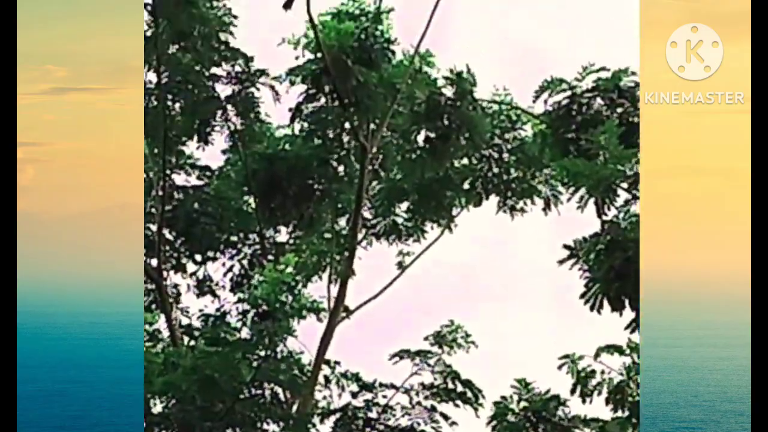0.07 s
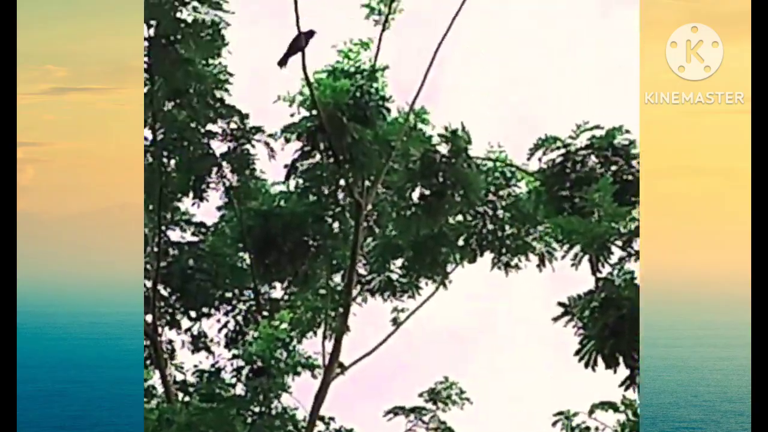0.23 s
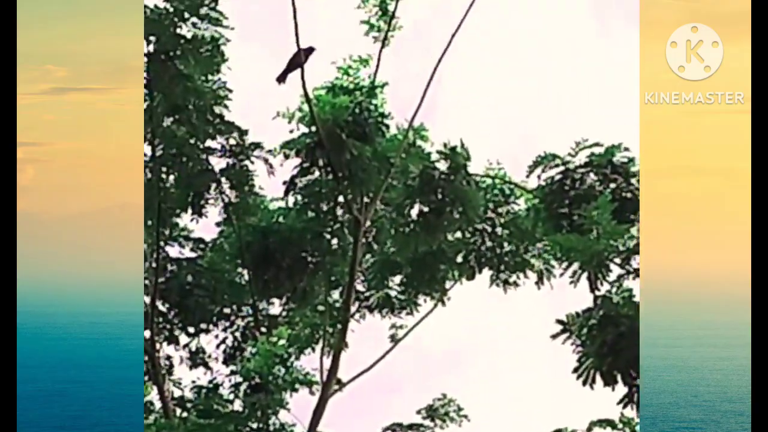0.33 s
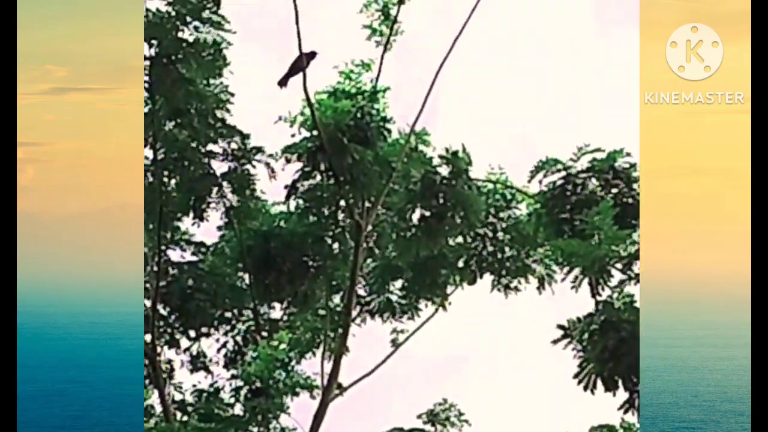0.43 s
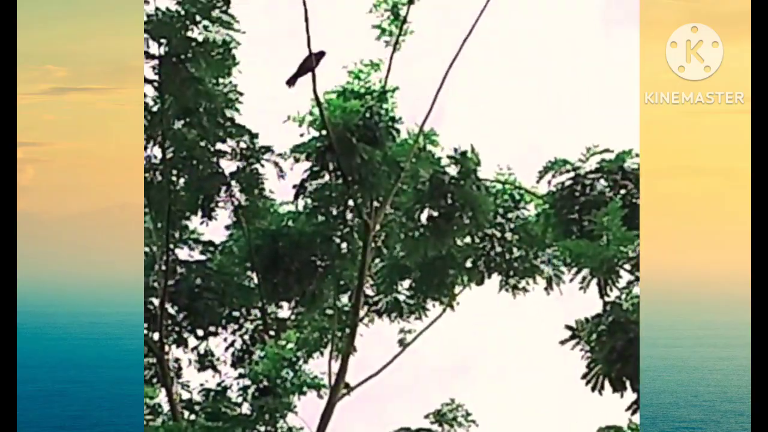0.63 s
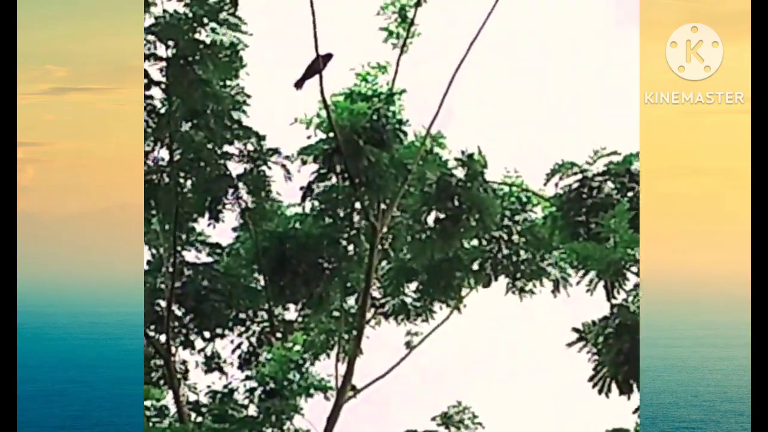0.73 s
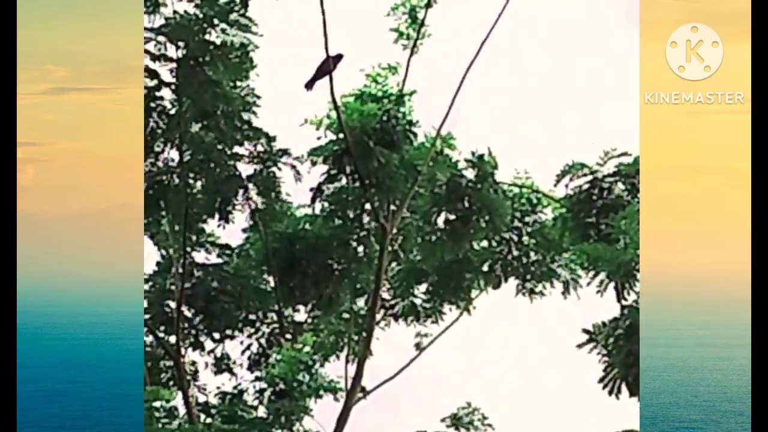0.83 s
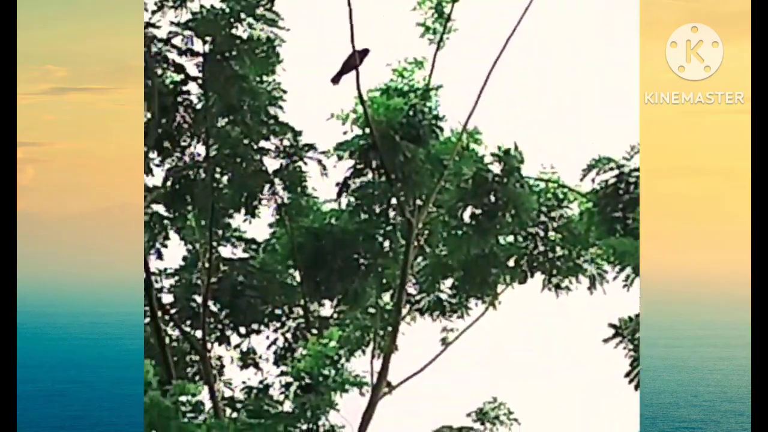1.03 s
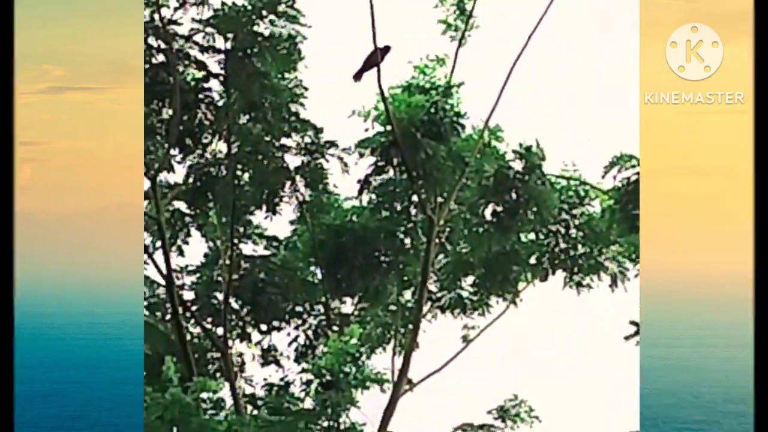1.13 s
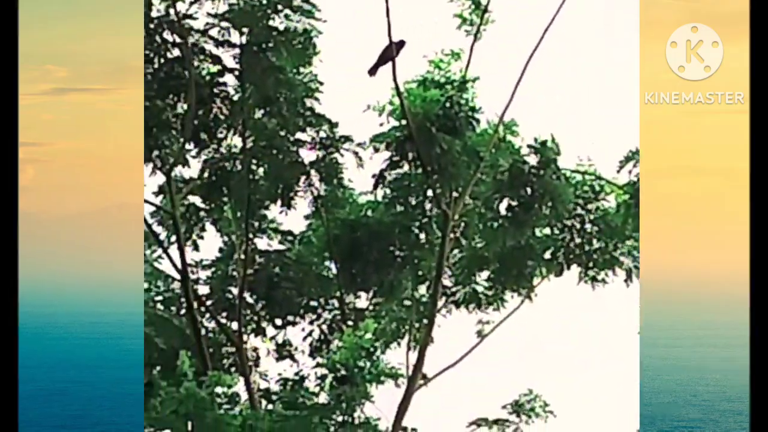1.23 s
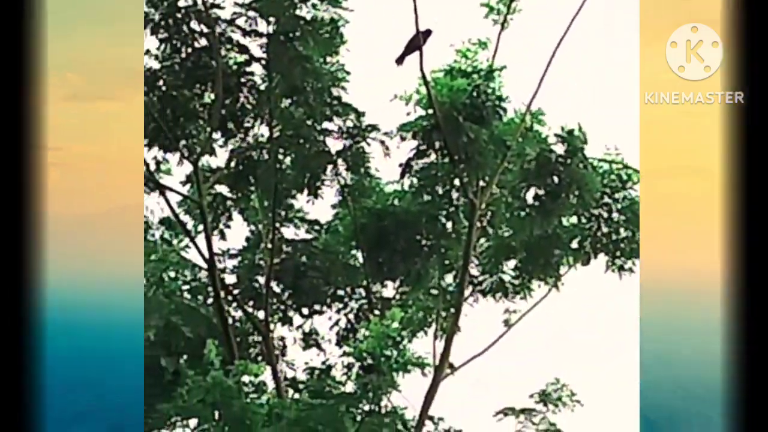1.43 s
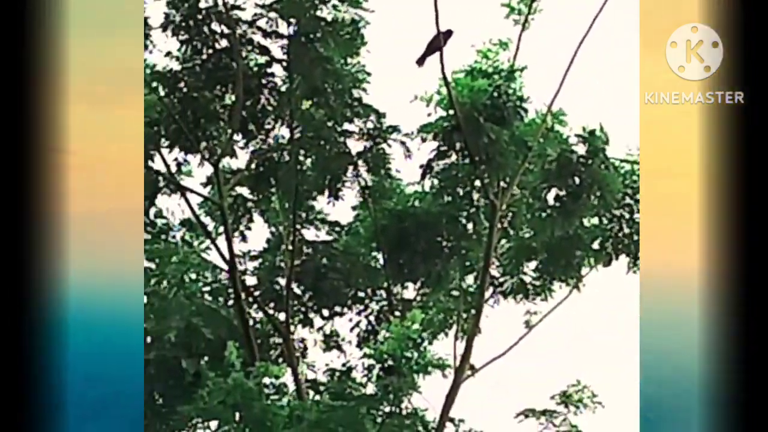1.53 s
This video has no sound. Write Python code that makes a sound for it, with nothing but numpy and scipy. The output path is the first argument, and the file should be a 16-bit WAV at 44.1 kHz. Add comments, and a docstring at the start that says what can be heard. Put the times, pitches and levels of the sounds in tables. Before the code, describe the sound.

A koel whistles one loud, nearly pure note from about 0.2 to 0.6 seconds, sagging, rising and falling away, then echoing among the trees. A small bird gives quieter high trills that slow as they go, at the start, at 0.6 and at 1.2 seconds, with a few short chirps from others. A faint distant engine drone and soft open-air rumble and hiss continue throughout.

```python
"""Among leafy trees in the open air, a koel gives one loud whistled note that sags, rises and falls away.
Its voice box makes a nearly pure tone, a second, slower vibration adds side tones, and the note rings
on among the trees. A small bird repeats a high trill of quick downward sweeps that slows as it goes,
and others chirp. Behind the birds a distant engine drones and the open air rumbles and hisses."""
import sys
import numpy as np
from scipy import signal
from scipy.fft import rfft, irfft
from scipy.io import wavfile
from scipy.ndimage import uniform_filter1d

SR = 44100
rng = np.random.default_rng(int(sys.argv[2]) if len(sys.argv) > 2 else 0)


def inscribe(sig):
    """Save sig as 16-bit PCM at rate SR to the path in sys.argv[1].

    A 1-D sig is mono; a 2-D sig holds one channel per row.
    Samples are clipped to [-1, 1] before scaling.
    """
    pcm = np.round(np.clip(np.atleast_2d(sig).T, -1, 1) * 32767)
    wavfile.write(sys.argv[1], SR, pcm.astype(np.int16))


N = 70560
TIME = np.arange(N) / SR

# the koel's note: (time [s], pitch [Hz])
KOEL_PITCH = [(.206, 850), (.22, 1170), (.234, 1256), (.27, 1229), (.305, 1202), (.335, 1194), (.365, 1201),
              (.4, 1229), (.44, 1278), (.475, 1317), (.503, 1327), (.53, 1310), (.555, 1272), (.58, 1165),
              (.605, 1020), (.64, 850)]
# its main tone through the branches; pan means left minus right: (time [s], level [dB], pan [dB])
KOEL_LEVEL = [(0.208, -51, -35), (0.226, -29, 22), (0.241, -19.5, 0.5), (0.259, -19.6, 6),
              (0.289, -22, -16), (0.303, -28, -20), (0.33, -25, -12), (0.359, -25, -4), (0.388, -18.5, -12),
              (0.422, -17.5, 2), (0.436, -27.5, 2), (0.457, -25.5, -15), (0.469, -19, 1),
              (0.49, -19.5, -8.5), (0.527, -21.5, -2), (0.543, -32, -5), (0.554, -21.5, 9),
              (0.564, -31.5, -2), (0.573, -26, -12), (0.579, -28, -7), (0.61, -30.5, -9.5),
              (0.639, -45.5, -2)]
# how much sooner that tone reaches the left ear: (time [s], lead [ms])
LEFT_LEAD = [(.425, 0.31), (.468, 0.075), (.53, 0.078), (.56, 0.37)]
# the voice is rough as it starts and as it falls away: (time [s], phase jitter [rad])
ROUGHNESS = [(.21, 0.61), (.232, 0.01), (.55, 0.069), (.6, 0.29)]
# the tone an octave up, which flares at the start and stays strong in the fall: (time [s], level [dB])
OCTAVE = [(.205, -52), (.22, -42.5), (.25, -60), (.272, -44), (.31, -57), (.35, -63), (.39, -43),
          (.42, -54), (.495, -43), (.555, -47.5), (.595, -44), (.64, -62)]
# the bird's effort, which sets the high overtones and the rasp: (time [s], gain [dB])
EFFORT = [(.205, -15), (.26, -3), (.52, -2.5), (.64, -9)]
# high overtones: (multiple of the pitch, base level [dB])
OVERTONES = [(3, -60), (4, -65), (5, -50.5), (6, -57), (7, -71), (8, -67)]
# depth of the flutter, the second vibration, strongest at the top of the note: (time [s], gain [dB])
FLUTTER_DEPTH = [(.22, -13.5), (.41, -13), (.44, -3.5), (.53, -2), (.57, -16.5)]
# tones made by the flutter: (multiple of the pitch, flutter steps up or down, base level [dB])
SIDE_TONES = [(1, -1, -48), (1, 1, -50), (2, -1, -49), (4, 1, -46), (5, -1, -58), (5, 1, -53), (6, -1, -61),
              (6, 1, -59)]
# resonances of the throat: (centre [Hz], width [Hz], gain [dB])
THROAT = [(5980, 170, 8), (7900, 220, -5), (10500, 420, 11)]
# colour of the rasp in the note: (frequency [Hz], relative level [dB])
RASP_COLOUR = [(700, -19), (1200, -13), (2300, 1.5), (3500, 1), (5000, -2.5), (6600, 11), (8800, -10),
               (10500, 6), (12000, -19), (14500, 1)]
# where the overtones and rasp sit between the ears: (frequency [Hz], pan [dB])
VOICE_PAN = [(2400, -8.5), (5800, 0), (10500, -8)]
# echoes from the trees: (delay [s], gain [dB], pan [dB])
TREE_ECHOES = [(0.054, -18.5, -10.5), (.099, -23, -6), (.19, -22, -5.5), (0.301, -27.5, -4.5),
               (.5, -39, -6), (.76, -39, -0.5)]
# the small bird's trills: (start [s], length [s], base level [dB])
TRILLS = [(-.04, 0.34, -40), (0.592, 0.36, -41.5), (1.2, .43, -41)]
# how each trill swells: (share of its length, gain [dB])
TRILL_SWELL = [(.25, -6.5), (.55, -2), (1, -4)]
# single chirps: (start [s], length [s], first pitch [Hz], last pitch [Hz], wobble [Hz], level [dB])
CHIRPS = [(0, 0.12, 4680, 4170, 390, -46), (0.29, 0.066, 4660, 4520, 303, -47),
          (0.364, 0.057, 4700, 4190, 243, -45.5), (1.227, 0.059, 3870, 4270, 399, -45)]
# faint high lisps: (middle [s], length [s], level [dB])
LISPS = [(0.806, 0.42, -58), (1.16, 0.33, -57.5)]
# tones of the distant engine: (frequency [Hz], level [dB])
ENGINE_TONES = [(88, -57.5), (113, -45.5), (136, -49.5), (161, -54)]
# far rumble of the open air: (frequency [Hz], relative level [dB])
RUMBLE_COLOUR = [(25, -5.5), (60, -5), (110, 0.5), (200, -0.5), (300, -10), (430, -6.5), (560, -25),
                 (900, -22.5)]
# hiss of the open air: (frequency [Hz], relative level [dB])
HISS_COLOUR = [(560, 5), (900, 6.5), (1500, 5), (2700, 4), (3600, -2), (5000, 1), (7000, -9.5), (8300, -12),
               (10200, -9.5), (11200, -40.5), (15000, -11)]
# where the open air sits between the ears: (frequency [Hz], pan [dB])
AIR_PAN = [(2000, -1), (7000, -1.5)]
# how alike a noise is in the two ears: (frequency [Hz], likeness [0 to 1])
EAR_LIKENESS = [(130, 0.86), (630, 0.78), (1390, 0.28), (14000, 0.089)]

FLUTTER_HZ, AT_PITCH_HZ, FLUTTER_POWER = 330, 1195, 2.2   # the flutter rises faster than the pitch
RASP_DB, FLICKER_DB, JITTER_HZ = -40.5, 3.5, 95
FIRST_GAP_S, LAST_GAP_S = .00803, .034   # from one sweep of a trill to the next
TRILL_START_HZ, TRILL_END_HZ, SWEEP_HZ, SWEEP_SHARE = 4970, 5320, 820, .75
TRILL_WOBBLE_HZ, WOBBLE_RATE_HZ = 110, 600   # a fast pitch wobble makes the small birds sound rough
WHISTLE_START_S, WHISTLE_S, WHISTLE_HZ, WHISTLE_DB = .8, .135, 4020, -56.5
LISP_HZ, LISP_WOBBLE_HZ = 7030, 370
CHIRP_PAN_DB, WHISTLE_PAN_DB, LISP_PAN_DB = -8.5, 7, 20
ECHO_CUT_HZ, ECHO_SMEAR_S, ECHO_SMEAR_DB = 2040, 0.0036, -2.5
ECHO_OVERTONE_DB = 7.5   # lift of the overtones before the trees dull them
KOEL_RING_DB, TRILL_RING_DB, CHIRP_RING_DB = -16.5, 1, -0.5   # how strongly each rings in the grove
LOW_RING_S, HIGH_RING_S, RING_SPLIT_HZ = 2.1, 0.79, 1580   # times to fade by 60 dB
RUMBLE_DB, HISS_DB, NOISE_LEAD_S = -45, -49.5, .00036
CUTOFF_HZ = 15300


def koel():
    """The voice box whistles a nearly pure tone with overtones and rasp; its flutter adds side tones."""
    pitch = uniform_filter1d(in_time(KOEL_PITCH)[0], size=500)
    phase = phase_of(pitch) + in_time(ROUGHNESS)[0] * drift(JITTER_HZ)
    flutter_hz = FLUTTER_HZ * (pitch / AT_PITCH_HZ) ** FLUTTER_POWER
    flutter_phase = phase_of(flutter_hz)
    effort_db, depth_db = in_time(EFFORT)[0], in_time(FLUTTER_DEPTH)[0]
    start, end = KOEL_LEVEL[0][0], KOEL_LEVEL[-1][0] + 0.014
    gate = np.clip(np.minimum(TIME - start, end - TIME) / 0.0029, 0, 1)   # quick fade in and out

    overtones = voice_tone(2 * pitch, 2 * phase, in_time(OCTAVE)[0])
    for multiple, db in OVERTONES:
        overtones += voice_tone(multiple * pitch, multiple * phase, db + effort_db)
    for multiple, step, db in SIDE_TONES:
        side_hz = multiple * pitch + step * flutter_hz
        overtones += voice_tone(side_hz, multiple * phase + step * flutter_phase, db + depth_db)
    rasp = from_db(RASP_DB + (effort_db + depth_db) / 2) * noise(RASP_COLOUR, VOICE_PAN)
    edge = gate * (overtones + rasp)   # everything but the main tone

    level_db, pan_db = in_time(KOEL_LEVEL)
    strength = np.sqrt(2) * gate * from_db(level_db)
    ear_shift = np.pi * pitch * in_time(LEFT_LEAD)[0] / 1000 * np.array([[1], [-1]])
    direct = strength * np.sin(phase + ear_shift) * panned(pan_db) + edge
    whistle = strength * np.sin(phase)
    echoes = tree_echoes(whistle + from_db(ECHO_OVERTONE_DB) * edge[1])
    return direct + echoes + from_db(KOEL_RING_DB) * grove(whistle + edge[1])


def voice_tone(hz, phase, db):
    """One flickering overtone or side tone of the koel, coloured by its throat."""
    throat_db = sum(gain * np.exp(-((hz - centre) / width) ** 2) for centre, width, gain in THROAT)
    flicker_db = FLICKER_DB * np.array([drift(20), drift(15.5)])
    tone = np.sqrt(2) * np.sin(phase + rng.uniform(0, np.pi / 2, (2, 1)))
    return from_db(db + throat_db + flicker_db) * panned(at_hz(VOICE_PAN, hz)) * tone


def trills():
    """A small bird sings runs of quick downward sweeps that slow, rise and swell; leaves scatter them."""
    song = np.zeros(N)
    wobble_hz = TRILL_WOBBLE_HZ * drift(WOBBLE_RATE_HZ)
    for start, run_s, db in TRILLS:
        onset = start
        while onset < start + run_s:
            along = (onset - start) / run_s
            gap = FIRST_GAP_S * (LAST_GAP_S / FIRST_GAP_S) ** along * rng.uniform(.984, 1.016)
            length = gap * SWEEP_SHARE
            centre_hz = TRILL_START_HZ + (TRILL_END_HZ - TRILL_START_HZ) * along
            hz = centre_hz + wobble_hz + SWEEP_HZ * (.5 - np.clip((TIME - onset) / length, 0, 1))
            level_db = db + np.interp(along, *np.transpose(TRILL_SWELL)) + rng.normal(0, 1.5)
            song += from_db(level_db) * arch(onset, length) * np.sin(phase_of(hz))
            onset += gap
    leaves = rng.standard_normal((2, N)) * np.exp(-TIME / 0.012)
    return from_db(-2) * song + scatter(song, leaves) + from_db(TRILL_RING_DB) * grove(song)


def chirps():
    """Other small birds add short rough glides, a thin far whistle and faint hissy lisps."""
    calls, lisps = np.zeros((2, N))
    for start, length, first_hz, last_hz, wobble_hz, db in CHIRPS:
        glide_hz = np.interp(TIME, [start, start + length], [first_hz, last_hz])
        hz = glide_hz + wobble_hz * drift(WOBBLE_RATE_HZ)
        calls += from_db(db) * arch(start, length) * np.sin(phase_of(hz))
    swell = np.sqrt(arch(WHISTLE_START_S, WHISTLE_S).clip(0))
    whistle = from_db(WHISTLE_DB) * swell * np.sin(2 * np.pi * WHISTLE_HZ * TIME)
    for middle, length, db in LISPS:
        hz = LISP_HZ + LISP_WOBBLE_HZ * drift(WOBBLE_RATE_HZ)
        lisps += from_db(db) * arch(middle - length / 2, length) * np.sin(phase_of(hz))
    direct = calls * panned(CHIRP_PAN_DB) + whistle * panned(WHISTLE_PAN_DB)
    direct += lisps * panned(LISP_PAN_DB)
    return direct + from_db(CHIRP_RING_DB) * grove(calls + whistle + lisps)


def tree_echoes(x):
    """Single treetops throw the sound back, each as a dull, distinct echo with a short smear."""
    echoes, dull = np.zeros((2, N)), filtered(x, ECHO_CUT_HZ, "low")
    for delay, db, pan_db in TREE_ECHOES:
        treetop = rng.standard_normal((2, N)) * np.exp(-TIME / ECHO_SMEAR_S)
        late = np.interp(TIME - delay, TIME, dull, left=0)
        smear = from_db(ECHO_SMEAR_DB) * scatter(late, treetop)
        echoes += from_db(db) * panned(pan_db) * (late + smear)
    return echoes


def grove(x):
    """Many leaves and trunks scatter the sound so that it rings on; the treble dies first."""
    white = rng.standard_normal((2, N))
    low = 0.56 * filtered(white, RING_SPLIT_HZ, "low") * from_db(-60 * TIME / LOW_RING_S)
    high = filtered(white, RING_SPLIT_HZ, "high") * from_db(-60 * TIME / HIGH_RING_S)
    return scatter(x, low + high)


def engine(waver_db=2.5, wander_rad=0.68):
    """A far engine drones on a few low tones that waver in level and pitch."""
    drone = np.zeros(N)
    for hz, db in ENGINE_TONES:
        strength = np.sqrt(2) * from_db(db + waver_db * drift(3.5))
        phase = 2 * np.pi * (hz * TIME + rng.random()) + wander_rad * drift(2.5)
        drone += strength * np.sin(phase)
    return drone


def open_air():
    """A steady far rumble and a soft hiss."""
    rumble = from_db(RUMBLE_DB) * noise(RUMBLE_COLOUR, AIR_PAN)
    return rumble + from_db(HISS_DB) * noise(HISS_COLOUR, AIR_PAN)


def noise(colour, pan):
    """Stereo noise of strength 1; the part that both ears share comes from the left."""
    hz = np.arange(N // 2 + 1) * SR / N
    shared, *own = rfft(rng.standard_normal((3, N)))
    alike = np.clip(at_hz(EAR_LIKENESS, hz), 0, 1)
    lead = np.exp(1j * np.pi * hz * NOISE_LEAD_S * np.array([[1], [-1]]))
    ears = np.sqrt(alike) * shared * lead + np.sqrt(1 - alike) * np.array(own)
    lowest_hz, highest_hz = colour[0][0], colour[-1][0]
    fade_ends = 1 / (1 + (hz / highest_hz) ** 8) / (1 + (lowest_hz / (hz + 1)) ** 8)
    gain = from_db(at_hz(colour, hz)) * fade_ends * panned(at_hz(pan, hz))
    return unit_strength(irfft(gain * ears, N))


def scatter(x, tail):
    """Give a sound a stereo tail of echoes, scaled to an energy of 1 in each ear."""
    tail = tail / np.sqrt(np.sum(tail ** 2, axis=1, keepdims=True))
    return signal.fftconvolve(np.atleast_2d(x), tail, axes=1)[:, :N]


def drift(rate_hz):
    """A smooth random wander of typical size 1; a higher rate wanders faster."""
    r = np.exp(-2 * np.pi * rate_hz / SR)
    return unit_strength(signal.lfilter([1], [1, -2 * r, r * r], rng.standard_normal(2 * N))[N:])


def filtered(x, hz, side):
    """Gently keep the "low" or "high" side of a frequency."""
    return signal.sosfilt(signal.butter(2, hz, side, fs=SR, output="sos"), x)


def arch(start, length):
    """A rounded rise and fall."""
    return np.sin(np.pi * np.clip((TIME - start) / length, 0, 1))


def phase_of(hz):
    """The running angle of a tone that follows a pitch curve."""
    return 2 * np.pi * np.cumsum(hz) / SR


def panned(pan_db):
    """Left and right gains that keep the total power the same."""
    return np.sqrt(2 / (1 + from_db(np.array([[-2], [2]]) * pan_db)))


def in_time(rows):
    """Turn a table over time into one curve for each value column."""
    times, *columns = np.transpose(rows)
    return [np.interp(TIME, times, column) for column in columns]


def at_hz(rows, hz):
    """Read a table between its frequencies, with octaves evenly spaced."""
    frequencies, values = np.transpose(rows)
    return np.interp(np.log(hz + 1), np.log(frequencies), values)


def from_db(db):
    """Turn decibels into a gain."""
    return 10 ** (np.asarray(db) / 20)


def unit_strength(x):
    """Scale to an average strength (rms) of 1."""
    return x / np.sqrt(np.mean(x ** 2) + 1e-20)


def scene():
    """Birds over the engine's drone and the open air."""
    return koel() + trills() + chirps() + engine() + open_air()


def record(dry):
    """Cut away the very highest treble."""
    return signal.sosfilt(signal.cheby2(12, 70, CUTOFF_HZ, fs=SR, output="sos"), dry)


dry = scene()
out = record(dry)
inscribe(out)
```